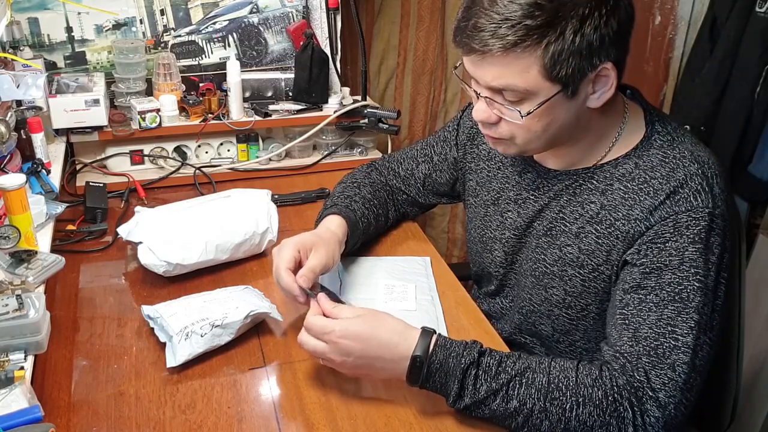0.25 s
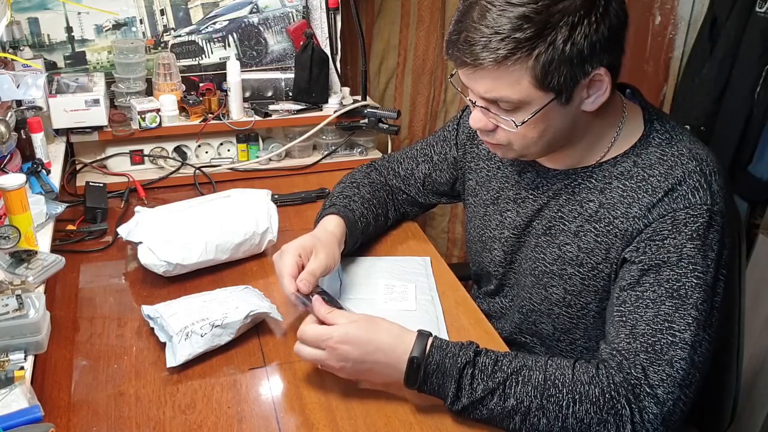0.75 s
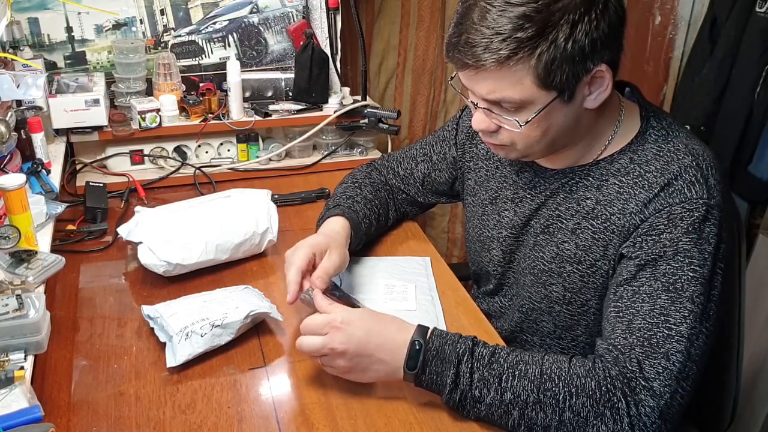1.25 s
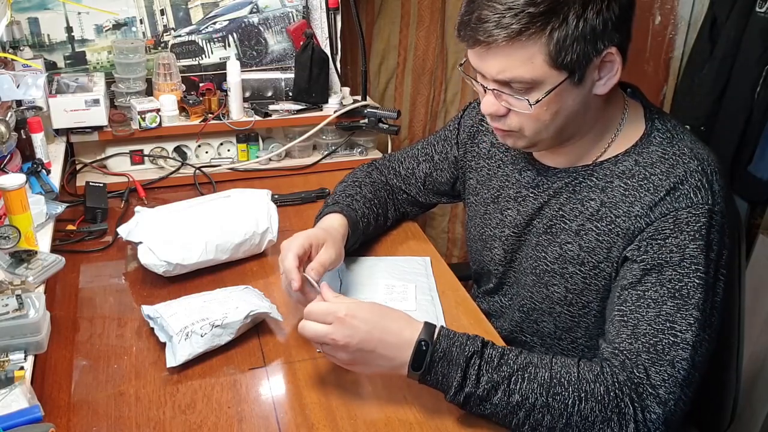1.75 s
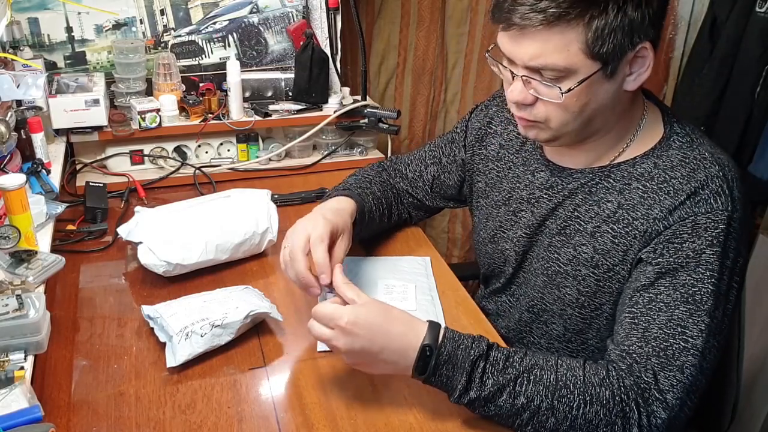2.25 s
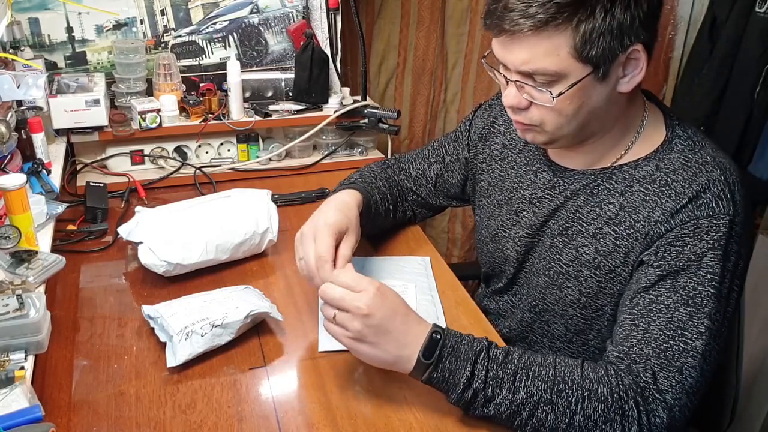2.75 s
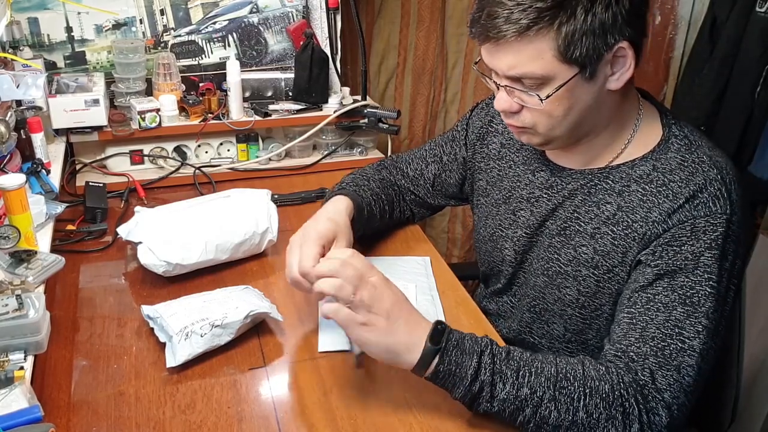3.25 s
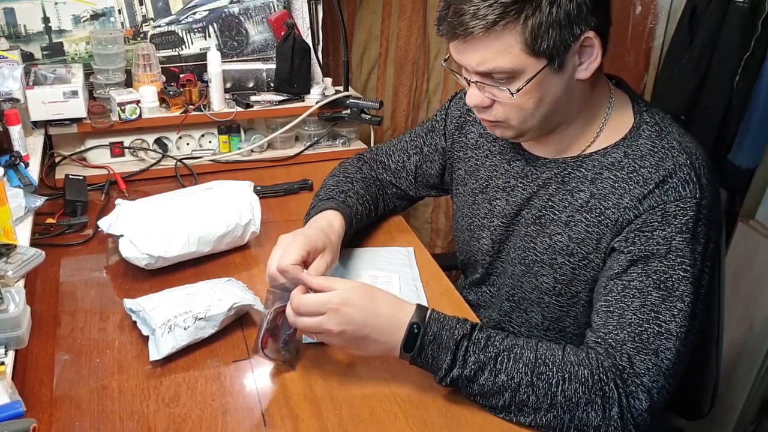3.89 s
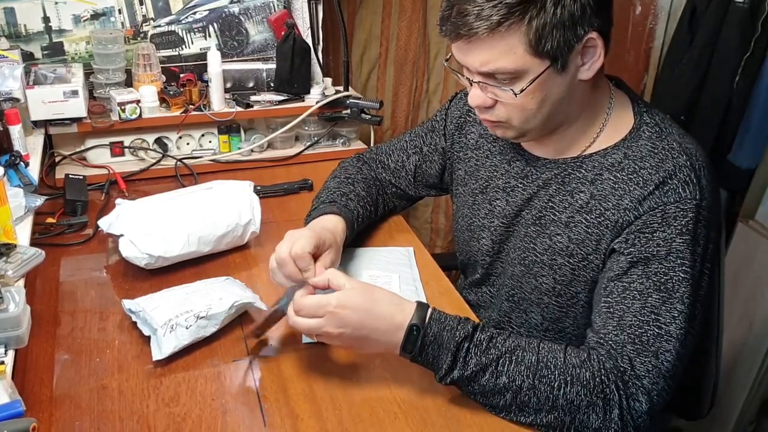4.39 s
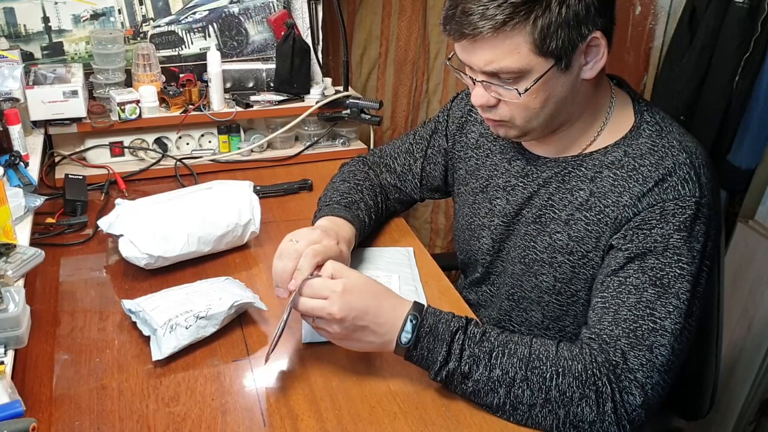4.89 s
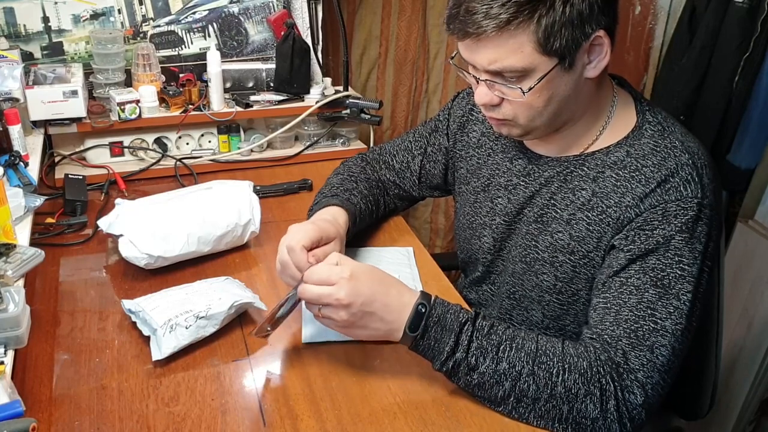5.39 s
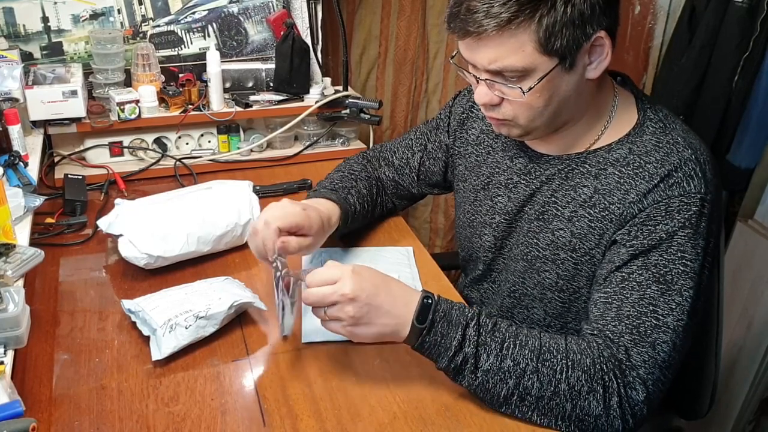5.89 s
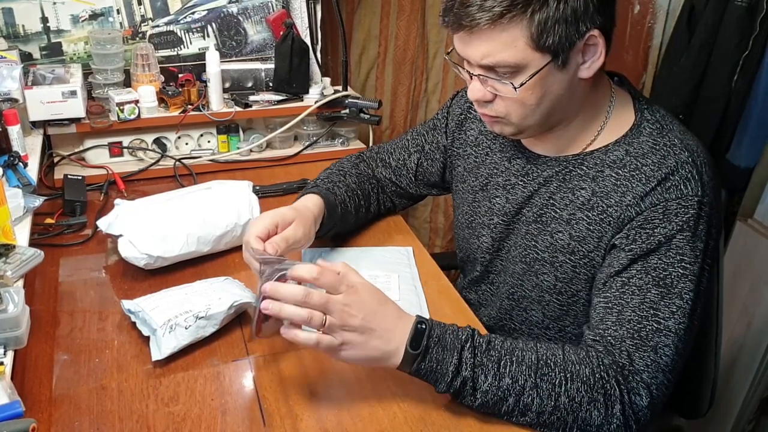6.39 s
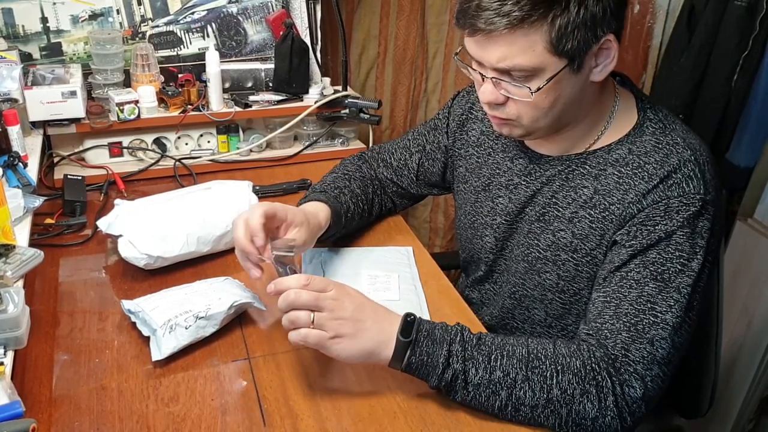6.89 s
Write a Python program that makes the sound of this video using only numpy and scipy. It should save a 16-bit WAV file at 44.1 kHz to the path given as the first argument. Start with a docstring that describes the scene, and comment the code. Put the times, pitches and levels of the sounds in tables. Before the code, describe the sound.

A small packet of thin plastic film is handled over a wooden table in a quiet room. Bright, dry snaps come singly and in flurries over faint rustle, with tiny hollow pops. A dense burst comes early, then a sparse lull, then scattered crackles. Late on, the seal rips in a loud cluster with soft low bumps on the table, followed by weaker snaps. Close stereo phone pickup, short room tails.

```python
"""Hands open a packet of thin plastic film over a table: creases snap singly and in flurries (noise cracks with
short tails) from 0.1 s on, over faint rustle (random ticks and hiss); air pockets pop (decaying sines) from 0.6 s.
A dense flurry comes at 1.4 s; wrists bump the table (sagging low sines and dull noise) from 2 s; the packet lifts
at 2.5 s and the snaps thin out near 3 s. The seal rips loudly around 5.8 s (crowded random snaps), then weaker
snaps run on to 7.1 s. Quiet room tone (coloured noise) lies under it all."""
import sys
import numpy as np
from scipy import signal
from scipy.fft import rfft, irfft, next_fast_len
from scipy.io import wavfile
from scipy.ndimage import uniform_filter1d, map_coordinates

SR = 44100
rng = np.random.default_rng(int(sys.argv[2]) if len(sys.argv) > 2 else 0)


def unload_wav(signal):
    """Save mono or channel-first audio to the path in sys.argv[1] as 16-bit WAV at rate SR, clipped to [-1, 1]."""
    wavfile.write(
        sys.argv[1],
        SR,
        np.round(np.clip(np.atleast_2d(signal).T, -1, 1) * 32767).astype(np.int16),
    )


N = 314874


def amp(db):
    """Amplitude from dB."""
    return 10 ** (np.asarray(db) / 20)


def unit(x):
    """Scale to unit rms along the last axis."""
    return x / np.sqrt(np.mean(x ** 2, axis=-1, keepdims=True) + 1e-20)


def along(points, hz):
    """Interpolate (f/Hz, value) on a log frequency axis."""
    f, v = np.transpose(points)
    return np.interp(np.log(hz + 1), np.log(f + 1), v)


def curve(rows):
    """One value per sample from (t/s, value) rows."""
    return np.interp(np.arange(N) / SR, *np.transpose(rows))


def wobble(knots_per_s):
    """Smooth random curve."""
    knots = rng.standard_normal(int(N * knots_per_s / SR) + 4)
    return map_coordinates(knots, [np.arange(N) * knots_per_s / SR])


def filtered(x, response):
    """x through a (complex) response of frequency."""
    m = next_fast_len(N + SR // 2)
    return irfft(rfft(x, m) * response(np.fft.rfftfreq(m, 1 / SR)), m)[..., :N]


def shaped(noise, envelope):
    """Noise under an envelope, with the rms of the envelope."""
    return unit(noise * envelope) * np.sqrt(np.mean(envelope ** 2, axis=-1, keepdims=True))


# colour of the film: [f/Hz, density/dB per Hz]
FILM_COLOUR = [(120, -67.5), (200, -33.5), (312, -34), (476, -8.5), (584, -12), (652, -5), (1050, -12.5),
               (1640, -1), (1940, 4), (5980, 2.5), (8970, -4), (15000, 4), (16500, -24)]
# resonances of the air between packet, hands and table: [f/Hz, width/Hz, level/dB before a common gain]
HOLLOW = [(650, 67, -9.5), (940, 29, -1.5), (1421, 43, -1)]
LIFTED_S = 2.5  # the packet leaves the paper under it


def film(hz, lying=0):
    """Gain of film colour and hollow; the upper resonances sound only while the packet lies low."""
    first, *upper = [2.4 * amp(db) / (1 + (2 * (hz - c) / w) ** 2) for c, w, db in HOLLOW]
    return amp(along(FILM_COLOUR, hz)) * (1 + first + lying * sum(upper))


# answer of table and room to body, middle, sheen: [level/dB, t60/s before an extra fall common to all]
TAILS = [(-8.5, 0.8), (-1.5, 0.12), (1, 0.093)]
BODY_HZ, SHEEN_HZ = 1600, 8500
LUMPY_DB = 3  # depth of each crease's own colour
CRACK_DB, CRACK_RISE_S = 10, .0005
ECHO_S, ECHO_DB = .004, -8  # crack back off the table; delay scattered x 0.5 to 1.5


def crease(rows):
    """Each crease has its own lumpy colour: a crack of a few ms, then a tail that dies faster in the treble."""
    size = 6144
    s, db, body_db, sheen_db = np.transpose(rows)
    t, hz = np.arange(size) / SR, np.fft.rfftfreq(size, 1 / SR)

    # short creases: little body, bright middle
    bright_hz = np.clip(4600 * np.exp(0.12 * (sheen_db - body_db)), 2000, 7500)
    peak = 1 + 1.3 / (1 + (np.log((hz + 1) / bright_hz[:, None]) / 0.48) ** 2)
    lumps = unit(uniform_filter1d(rng.standard_normal((len(s), len(hz))), size=110, axis=1))
    colour = film(hz, s[:, None] < LIFTED_S) * peak * amp(LUMPY_DB * lumps)
    noise = rfft(rng.standard_normal((len(s), 2, size))) * colour[:, None]

    low = 1 / (1 + (hz / BODY_HZ) ** 12)
    high = 1 / (1 + (SHEEN_HZ / (hz + 1)) ** 16)
    # a small crease radiates little in the low middle
    thin_hz = np.clip(1200 * np.exp(-0.022 * body_db), 600, 3300)
    middle = (1 - low - high) / (1 + (thin_hz[:, None, None] / (hz + 1)) ** 6)
    rises_s, cracks_t60_s = [.0025, CRACK_RISE_S, CRACK_RISE_S], [.02, .005, .005]
    bands = zip([low, middle, high], [body_db, 0 * db, sheen_db], TAILS, rises_s, cracks_t60_s)

    # after-crackle and near echoes
    flicker = amp(1.31 * unit(uniform_filter1d(rng.standard_normal((len(s), 1, size)), size=90)))
    back_s = ECHO_S * (.5 + rng.random((len(s), 1, 1)))
    sound = 0
    for share, band_db, (tail_db, t60_s), rise_s, crack_t60_s in bands:
        band = irfft(noise * share)
        crack = lambda u: (1 - np.exp(-u / rise_s)) * amp(CRACK_DB - 60 * u / crack_t60_s)
        echo = amp(ECHO_DB) * crack(np.maximum(t - back_s, 0))
        tail = (1 - np.exp(-t / rise_s)) * amp(tail_db - 60 * t / t60_s - (t / 0.017) ** 2)
        whole = shaped(band, crack(t)) + shaped(band, (echo + tail) * flicker)
        sound = sound + amp(db + band_db)[:, None, None] * whole

    out = np.zeros((2, N + size))
    for at, one in zip(s, sound):
        out[:, round(at * SR):][:, :size] += one
    return out[:, :N]


# crease snaps: [t/s, level/dB, body under 1.6 kHz/dB re level, sheen over 8.5 kHz/dB re level]
SNAPS = [(0.1156, -22.5, -22, -3.5), (0.1433, -28.5, -14.5, -41), (0.1908, -28.5, -14.5, -6.5),
         (0.2119, -32, -10.5, -21), (0.2489, -32, -13.5, -31), (0.2592, -23.5, -17.5, -8.5),
         (0.3564, -48.5, 3.5, 2), (0.3758, -20, -11.5, -4), (0.4004, -21.5, -10, -4),
         (0.4249, -26.5, -13.5, -0.5), (0.4935, -24.5, -2, -20), (0.4992, -17.5, -19.5, -3.5),
         (0.641, -41, 3, -32), (0.6552, -36, -3, -17), (0.7272, -39, -8.5, -7.5), (0.7648, -46.5, 9.5, -28),
         (0.7794, -35, 1.5, -20), (0.7915, -21, -10.5, -8), (0.8, -32, -9.5, -6), (0.8065, -24.5, -2, -16),
         (0.8301, -45.5, -0.5, -4), (0.863, -34, -24.5, -18), (0.8898, -32, -2.5, -15),
         (0.9161, -24, -16, -5), (0.9577, -25.5, -17, -3.5), (1.0505, -25.5, -10, -9),
         (1.1428, -42, -10.5, -17), (1.2328, -22, -11, -8), (1.3047, -28, -6, -4), (1.3155, -28, -8, -7),
         (1.3417, -33, -6, -26), (1.3673, -29, -11.5, -10.5), (1.4025, -23.5, -8, -11),
         (1.4139, -16, -5.5, -4.5), (1.4286, -15, -17, -5), (1.446, -18, -2, 0), (1.4729, -21.5, -13, -3),
         (1.4803, -23.5, -29, 0), (1.5566, -38.5, -0.5, -3), (1.572, -17.5, -11, -9.5), (1.6011, -40, 5, 1),
         (1.6347, -34.5, -10.5, -8), (1.6864, -23.5, -9.5, 2.5), (1.7466, -38.5, -1, -4),
         (1.7647, -28.5, 1.5, -4), (1.7713, -17.5, -10, -3), (1.8107, -21.5, -6.5, 0),
         (1.8489, -29.5, -4.5, -6), (1.879, -30.5, -9.5, -10.5), (1.9254, -26.5, -8.5, 1.5),
         (1.9926, -19, -14.5, -6.5), (2.0239, -25.5, -14.5, -9), (2.035, -19.5, -3.5, -2),
         (2.049, -24.5, -12, -3.5), (2.0747, -17, -19.5, -6.5), (2.1521, -33, -7, -10),
         (2.1689, -23.5, -7.5, -3), (2.1816, -27.5, -4.5, -25), (2.1991, -21.5, -13.5, -3),
         (2.231, -33.5, -1, -5), (2.2443, -24, 1.5, -15), (2.2541, -26, -5.5, -4),
         (2.277, -30.5, -24.5, -24), (2.3101, -40.5, -8.5, -22), (2.3285, -37.5, -11, -12),
         (2.4346, -30, -14, -4.5), (2.4733, -26, -10.5, -4), (2.5915, -41, -22.5, -11),
         (2.636, -23.5, -15.5, -6.5), (2.6708, -45, -2, -6), (2.7267, -32.5, -10, -8.5),
         (2.7898, -31, -19.5, -16), (3.0572, -48.5, -13, -12.5), (3.1316, -39.5, 0, -19),
         (3.2012, -56.5, 10.5, -14), (3.2244, -51, 8.5, -17), (3.2702, -30, -13.5, -7.5),
         (3.473, -23, -14.5, -14), (3.4819, -26, -9.5, -2), (3.5233, -31.5, -12, -15),
         (3.5328, -41.5, -5, -24), (3.5495, -22.5, -14, -11), (3.5877, -22, -8.5, -0.5),
         (3.6079, -21.5, -26, -5), (3.756, -17.5, -44, -2.5), (3.7844, -26.5, -25, 6),
         (3.8085, -23.5, -19.5, -9), (3.9318, -26.5, -41, -19), (3.9417, -29, -23, -7),
         (4.0159, -22.5, -40, -7), (4.1263, -45.5, -57, 2.5), (4.2373, -47.5, -10.5, -8),
         (4.248, -46, -2, -1), (4.3922, -25, -14.5, -14.5), (4.4039, -23, -11.5, -7),
         (4.47, -20.5, -29.5, -5.5), (4.4917, -27.5, -13, -1.5), (4.57, -32.5, -14, -7),
         (4.5957, -22.5, -17, -9.5), (4.6787, -37.5, -15, -23), (4.8002, -41.5, -24, -26.5),
         (4.9315, -31, -18.5, -5), (4.9681, -32, -12.5, -5), (4.9925, -28, -15.5, -22),
         (4.9972, -20, -18, 0.5), (5.0411, -18, -21.5, -22), (5.1097, -24, -19.5, -3.5),
         (5.1391, -39.5, -4, -24), (5.1757, -34, -6.5, -25), (5.1804, -21, -42, -6.5),
         (5.2439, -49, 6.5, -1), (5.2573, -36, -6.5, -17), (5.2691, -22, -14.5, -12),
         (5.318, -32.5, -10, -9), (5.3432, -32.5, -13.5, -9), (5.354, -35.5, 0, -25), (5.4085, -29, -9, -6),
         (5.5154, -31.5, -14.5, -36), (5.5954, -33.5, -13.5, -11), (5.647, -19, -9, -4.5),
         (5.7273, -38, -18.5, 2), (5.7498, -5, -20.5, -9), (5.7595, -12.5, -14.5, -9.5),
         (5.7695, -12.5, -15, -19), (5.787, -7, -18, -25), (5.7948, -9, -12, 0.5), (5.839, -14, -8, -10),
         (5.8721, -26.5, -5, 5.5), (5.9206, -21, -9.5, -10.5), (5.9649, -24, -9.5, -23),
         (5.9752, -25, -9.5, 0.5), (5.9818, -22, -14.5, -13), (6.001, -34.5, -8, -12),
         (6.062, -27.5, -8, -12), (6.083, -35, -6.5, -6), (6.113, -49, -4.5, -20),
         (6.125, -42.5, -5.5, -17), (6.1573, -37.5, -9, -16), (6.169, -28.5, -14, -5),
         (6.2132, -25, -10.5, -12.5), (6.3221, -41.5, -1.5, -23), (6.3351, -27.5, -12.5, -12.5),
         (6.4176, -31, -14.5, -9), (6.7383, -31.5, -10, -14.5), (6.7576, -30, -9, -13),
         (6.7862, -34, -7.5, -6.5), (6.828, -33.5, -5, -7), (6.8462, -27, -10.5, -29),
         (6.8568, -29.5, -4.5, 4), (6.8895, -22, -11, -11.5), (6.9385, -41, -2.5, -4),
         (7.0259, -33, -12.5, -13.5), (7.0393, -29.5, -10.5, -13), (7.0665, -23.5, -14, -10.5),
         (7.1003, -30.5, -19, -24)]


def snaps():
    """Creases of the film buckle one by one and in flurries."""
    return crease(SNAPS)


# upper limit of snap level while the seal rips: [t/s, level/dB]
TEAR = [(5.796, -7.5), (5.845, -10), (5.873, -21.5), (5.909, -32)]


def tear(count=20):
    """The seal rips: snaps of scattered size and brightness, crowded along the rip."""
    times, levels = np.transpose(TEAR)
    when, size, bright = rng.random((count, 3)).T
    s = times[0] + (times[-1] - times[0]) * (np.arange(count) + when) / count
    db = np.interp(s, times, levels) - 10 * size
    return crease(np.transpose([s, db, -7 - 10 * bright, -13 + 8 * bright]))


# stretches of rustle, brief bursts of crackle to longer swishes; neighbours may join:
# [start t/s, length/s, level/dB]
STRETCHES = [(0.121, 0.17, -45), (0.394, 0.029, -47), (0.493, 0.016, -49), (0.61, 0.13, -66),
             (0.765, 0.075, -45.5), (0.87, 0.22, -57), (1.237, 0.18, -43), (1.426, 0.029, -25.5),
             (1.493, 0.13, -43.5), (1.765, 0.16, -45), (2.002, 0.031, -32.5), (2.154, 0.14, -37),
             (2.346, 0.097, -53), (2.621, 0.12, -42.5), (2.729, 0.098, -43.5), (3.074, 0.15, -47.5),
             (3.318, 0.078, -52), (3.484, 0.061, -36), (3.685, 0.04, -52), (3.978, 0.086, -49.5),
             (4.152, 0.13, -54), (4.389, 0.086, -45.5), (4.554, 0.14, -43.5), (4.7, 0.14, -50),
             (4.94, 0.015, -39.5), (5.04, 0.13, -43), (5.637, 0.16, -49.5), (5.862, 0.17, -39.5),
             (6.225, 0.0079, -32.5), (6.733, 0.094, -47.5), (6.859, 0.056, -34), (6.983, .06, -54)]
STRETCH_RISE_DB_PER_S, STRETCH_FALL_DB_PER_S = 904, 342.5
# rustle between stretches: [t/s, level/dB]
FAINT = [(0, -101), (0.07, -71), (0.35, -61), (1.2, -63), (2.58, -64.5), (3.0, -65), (4.3, -62.5),
         (5.5, -57.5), (6.15, -81.5), (6.535, -53), (6.63, -100), (6.735, -74.5), (7.14, -73)]


def rustle_gain():
    """Gain of the rustle: each stretch swells, holds and dies away; powers add over the faint level."""
    t = np.arange(N) / SR
    power = amp(2 * curve(FAINT))
    for s, length, db in STRETCHES:
        rise_db = STRETCH_RISE_DB_PER_S * np.maximum(s - t, 0)
        fall_db = STRETCH_FALL_DB_PER_S * np.maximum(t - s - length, 0)
        power = power + amp(2 * (db - rise_db - fall_db))
    return np.sqrt(power)


def patchy(x, depth_db):
    """Bands of colour come and go at random."""
    z = signal.stft(x, nperseg=512)[2]
    field = uniform_filter1d(rng.standard_normal(z.shape[1:]), size=10, axis=0)
    field = uniform_filter1d(field, size=16, axis=1)
    return signal.istft(z * amp(depth_db * field / field.std()), nperseg=512)[1][:, :N]


def rustle():
    """Tiny creases at random moments, each with the short tail of the room, over a wavering hiss."""
    t = np.arange(SR // 10) / SR
    # 4 layers, each about 90 ticks per s
    ticks = (rng.random((4, 1, N)) < 90 / SR) * amp(8.3 * rng.standard_normal((4, 1, N)))
    decay = amp(-60 * t / 0.14) + 0.63 * amp(-60 * t / 0.31)
    tails = rng.standard_normal((4, 2, len(t))) * decay
    crackle = unit(signal.fftconvolve(ticks, tails, axes=2).sum(axis=0)[:, :N])
    hiss = 0.59 * amp(1.0 * wobble(35)) * rng.standard_normal((2, N))
    mixed = patchy(crackle + hiss, depth_db=2.5)

    # colour relative to a full snap: [f/Hz, level/dB]
    tilt = [(500, 4.0), (1100, 3), (2000, -5.5), (3200, -3.5),
            (5000, -1.5), (7000, 0.5), (9000, -2.5), (16000, -7.0)]
    lying = filtered(mixed, lambda hz: film(hz, True) * amp(along(tilt, hz)))
    lifted = filtered(mixed, lambda hz: film(hz, False) * amp(along(tilt, hz)))
    return rustle_gain() * unit(np.where(np.arange(N) < LIFTED_S * SR, lying, lifted))


# air pockets popping with a hollow knock: [t/s, level/dB before rise and decay, f/Hz]
POPS = [(0.58, -45, 930), (0.605, -48, 940), (0.672, -32, 680), (0.744, -33, 1460), (0.7795, -28, 1630),
        (1.3045, -19, 1515), (1.384, -42, 1450), (5.3545, -22, 1617), (5.983, -34, 714), (1.4145, -12, 695),
        (3.056, -42, 1620), (3.131, -41, 603), (3.224, -37, 616), (4.247, -33.5, 605), (4.404, -27, 695),
        (5.9205, -13, 684), (6.322, -30.5, 842), (6.476, -46, 450)]
POP_RISE_S, POP_CYCLES = 0.0008, 24  # cycles to fall 60 dB


def pops():
    """Each air pocket rings a few cycles at its own pitch."""
    out, t = np.zeros(N + SR), np.arange(SR // 8) / SR
    for s, db, hz in POPS:
        envelope = amp(db - 60 * t * hz / POP_CYCLES) * (1 - np.exp(-t / POP_RISE_S))
        out[round(s * SR):][:len(t)] += envelope * np.sin(2 * np.pi * hz * t)
    return out[:N]


# wrists and packet on the table top: [t/s, level/dB before rise and decay, settled f/Hz]
BUMPS = [(1.99, -50, 53), (2.65, -53.5, 53.4), (3.299, -54, 65.6), (3.521, -47.5, 73.4), (4.249, -52, 127),
         (4.289, -56.5, 72), (4.834, -42.5, 77.7), (5.758, -37, 57.6), (5.801, -39, 81),
         (5.829, -31.5, 80.7), (5.952, -47, 127.4)]


def bumps():
    """Soft blows on the table top: a low ring that sags in pitch, and a dull puff."""
    out, t = np.zeros(N + SR), np.arange(SR // 4) / SR
    dull = signal.butter(3, [45, 260], "bandpass", fs=SR, output="sos")
    envelope = amp(-60 * t / 0.33) * (1 - np.exp(-t / 0.0021))
    for s, db, hz in BUMPS:
        puff = 0.86 * unit(signal.sosfilt(dull, rng.standard_normal(len(t)))) * amp(-60 * t / 0.92)
        # starts about 7 % sharp
        ring = np.sin(2 * np.pi * hz * (t + 0.0026 * (1 - np.exp(-t / 0.038))))
        out[round(s * SR):][:len(t)] += amp(db) * envelope * (ring + puff)
    return out[:N]


# room tone colour: [f/Hz, density/dB per Hz]
HUSH_COLOUR = [(20, -22.5), (45, 1), (90, -0.5), (200, -11.5), (500, -15), (2000, -22.5), (16500, -26)]
# room tone course, before a 9 dB lift: [t/s, level/dB]
HUSH_LEVEL = [(0, -74.5), (1.3, -71.5), (2.4, -77.5), (2.75, -71.5), (3.5, -75.5), (4, -78.5), (4.9, -73.5),
              (6.3, -72.5), (6.6, -82), (7.14, -78)]


def hush():
    """Room tone: low coloured noise with a wavering level."""
    tone = filtered(rng.standard_normal((2, N)), lambda hz: amp(along(HUSH_COLOUR, hz)))
    return amp(curve(HUSH_LEVEL) + 0.88 * wobble(35) + 9) * unit(tone)


# share of the left signal in the right: [f/Hz, likeness 0..1]
ALIKE = [(60, .9), (300, .95), (700, .88), (1400, .6), (4000, .38), (16000, .25)]
# phase by which left leads right: [f/Hz, phase/rad]
LEAD = [(20, 0.5), (300, 0.3), (1380, 0.96), (1720, 0.14), (2240, 6.62), (3700, 14.25), (5000, 16.54),
        (16500, 22.5)]


def ports(pair):
    """Two microphone ports: right mixes a phase-lagged left with the second signal, less alike in the treble."""
    def mix(hz):
        alike = np.clip(along(ALIKE, hz), 0, 1)
        return np.array([alike * np.exp(-1j * along(LEAD, hz)), np.sqrt(1 - alike ** 2)])

    right = filtered(pair, mix).sum(axis=0)
    return np.array([amp(-8.0) * pair[0], amp(-12.5) * right])


def scene():
    """All sources summed, heard at the two ports."""
    return ports(snaps() + tear() + rustle() + pops() + bumps() + hush())


TOP_HZ = 15900


def record(dry):
    """The phone keeps nothing above its band limit: a steep low-pass."""
    return filtered(dry, lambda hz: 1 / (1 + (hz / TOP_HZ) ** 200))


dry = scene()
out = record(dry)
unload_wav(out)
```